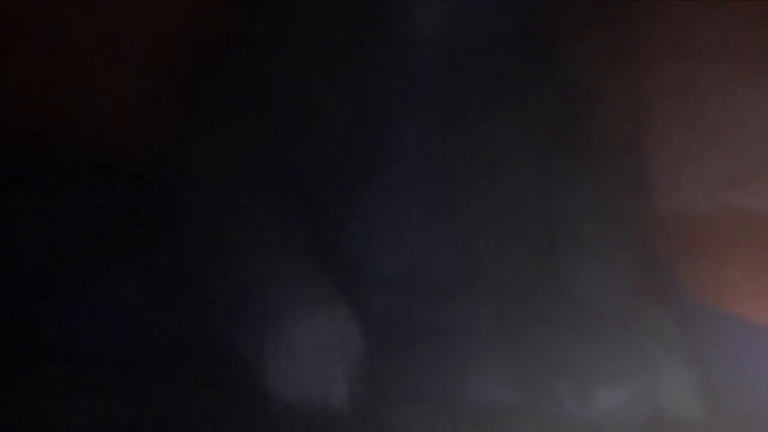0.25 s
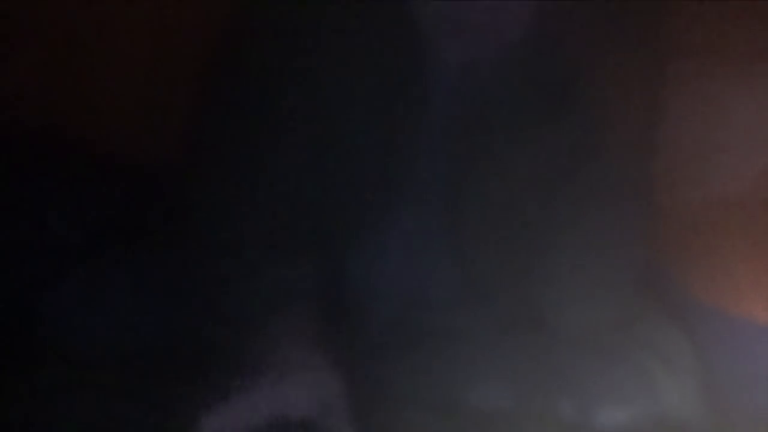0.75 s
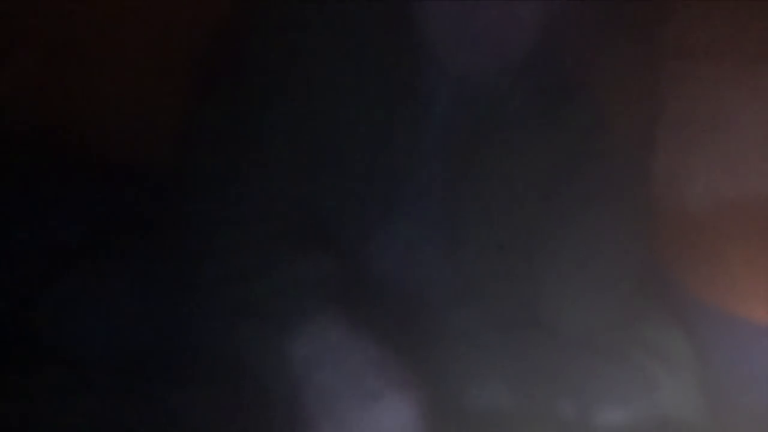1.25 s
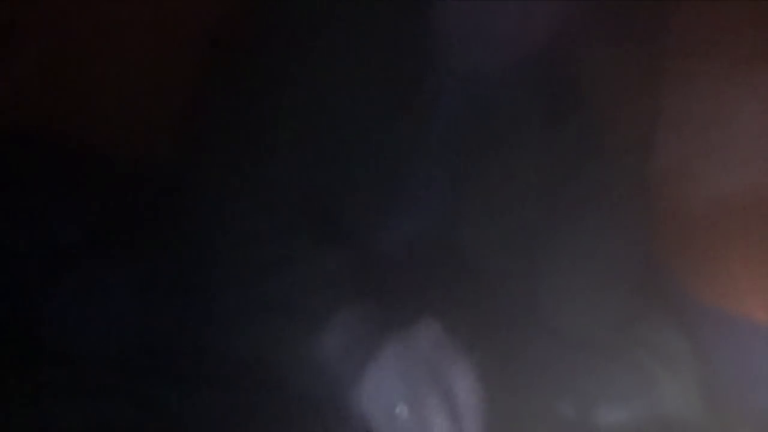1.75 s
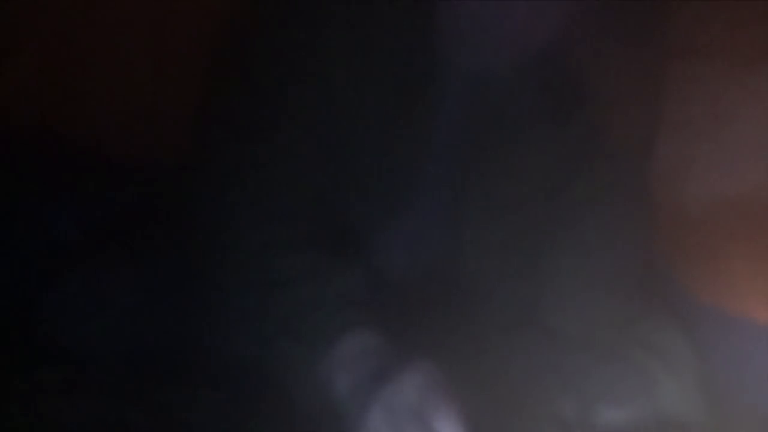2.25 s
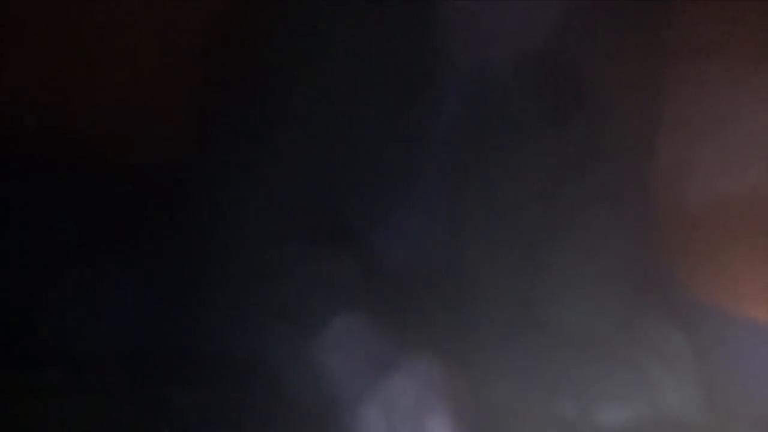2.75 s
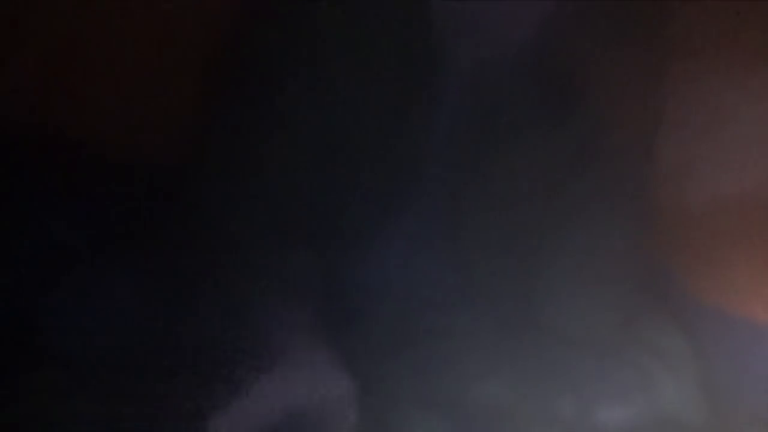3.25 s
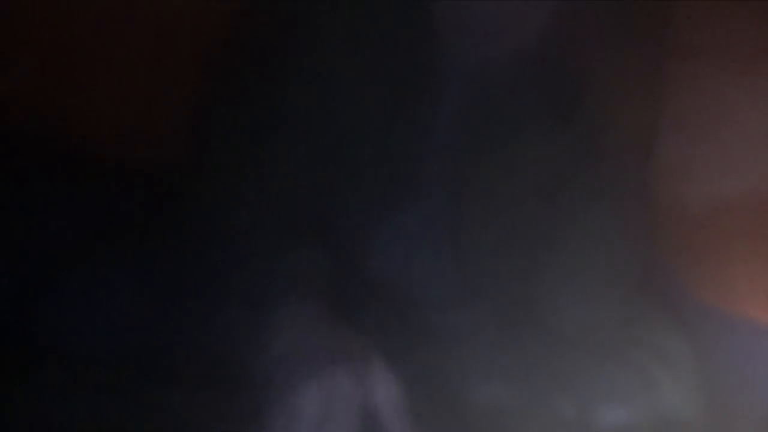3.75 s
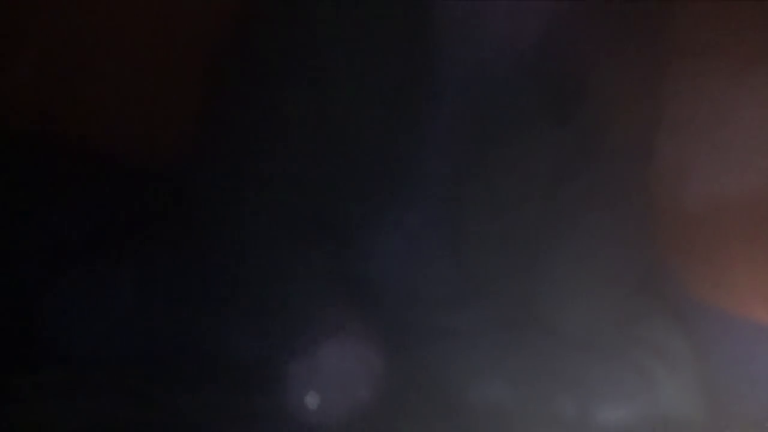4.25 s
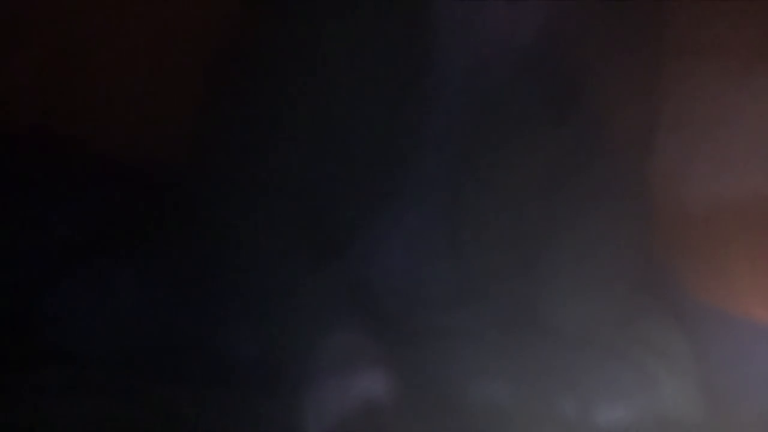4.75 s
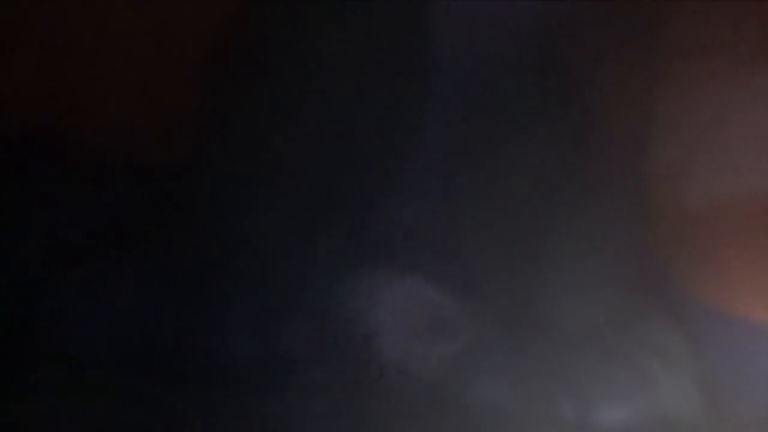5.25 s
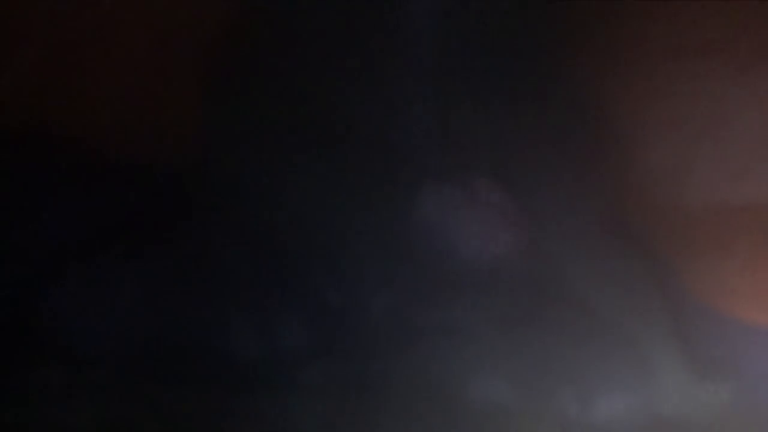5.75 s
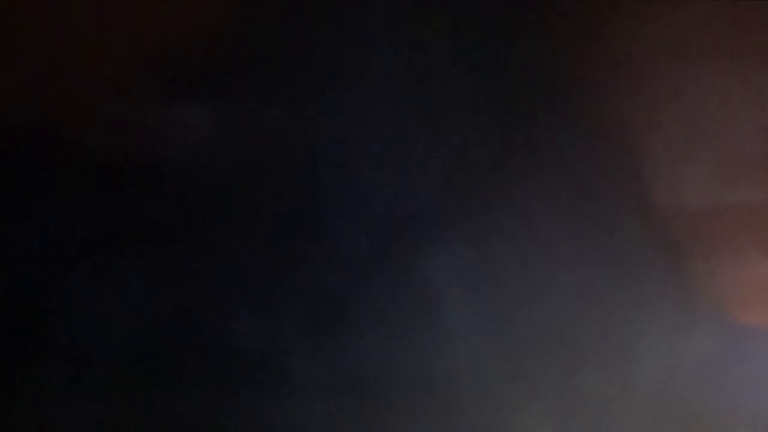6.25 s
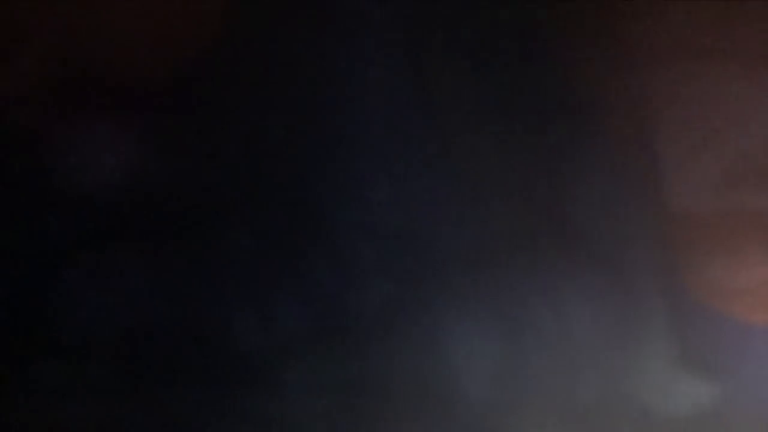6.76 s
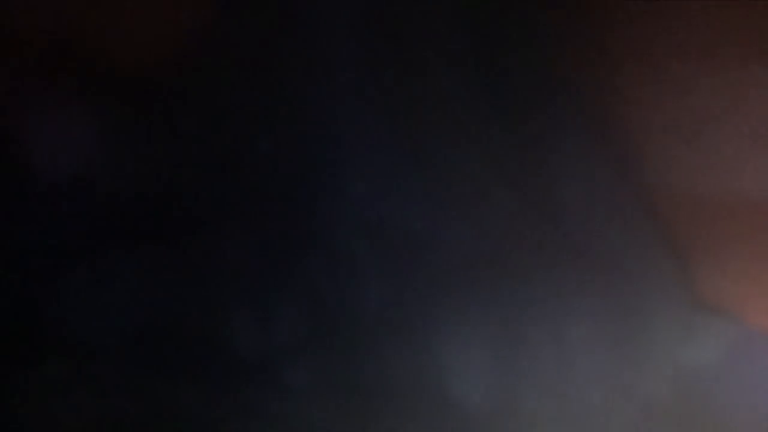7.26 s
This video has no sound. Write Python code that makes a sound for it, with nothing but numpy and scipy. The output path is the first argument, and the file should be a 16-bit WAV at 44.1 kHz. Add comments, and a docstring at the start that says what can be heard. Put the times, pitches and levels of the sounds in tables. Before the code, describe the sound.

Gritty finger strokes and sharp little ticks on a small box, one harsh scratching hiss early on, then rustling cloth over a soft outdoor hush.

```python
"""A small match case is handled close by in a quiet tent, over a soft outdoor hush that lasts throughout.
First sleeves swish; then fingers rub the case in gritty strokes of stick-slip friction, one a loud scratch.
Sharp ticks of matches on the case, damped resonances, join in; a thin, very faint whine pulses in the lull.
Further strokes and taps follow; lastly sleeves swish more strongly and ribbed fabric squeaks in narrow bands.
A faint hollow note, a wavering gliding tone, swells three times along the way."""
import sys
import numpy as np
from scipy import signal
from scipy.fft import rfft, irfft, next_fast_len
from scipy.io import wavfile

SR = 44100
rng = np.random.default_rng(int(sys.argv[2]) if len(sys.argv) > 2 else 0)


def master_out(mix):
    """Clip the mix to full scale and print it as 16-bit PCM to the path in sys.argv[1]."""
    frames = np.transpose(np.atleast_2d(mix))
    ceiling = np.clip(frames, -1, 1)
    pcm = np.round(ceiling * 32767).astype(np.int16)
    wavfile.write(sys.argv[1], SR, pcm)


N = 330309
TIME = np.arange(N) / SR   # s


# Each new grip changes how the rubbed edge and the wall ring:
# (start t/s, edge f/Hz, edge width/Hz, edge boost level/dB, wall f/Hz)
GRIPS = [(.7, 8170, 1600, 8.5, 2700), (1.07, 8700, 2200, 8, 6500), (1.319, 8350, 1110, 10, 3850),
         (1.44, 8600, 1500, 7, 4840), (1.665, 8500, 1900, 8, 3750), (1.815, 8450, 1100, 10.5, 6300),
         (1.965, 8650, 1710, 10, 3000), (3.29, 8350, 1700, 8, 2530), (3.54, 8600, 1400, 8, 5500),
         (4.371, 8300, 1300, 14, 4100), (4.54, 7900, 2500, 3.5, 4600), (4.78, 8400, 1000, 9, 4150),
         (4.969, 8800, 1800, 6, 4800), (5.115, 9000, 3980, 3, 6200)]


def rubbing(release_s=5.3):
    """Succession of boundary conditions: one grip hands over to the next until the case is let go."""
    ends = [row[0] for row in GRIPS[1:]] + [release_s]
    total = np.zeros(N)
    for (start, *ring), end in zip(GRIPS, ends):
        total += grip(start, end, *ring)
    return total


# Broad colour of the friction: (f/Hz, level/dB per Hz)
FRICTION_COLOUR = [(40, -56), (230, -32), (600, -17), (850, -25.5), (1080, -16.5), (1900, -14), (2180, -18),
                   (2500, -8.5), (5000, -3.5), (7000, -1), (10000, 2.5), (11800, -4.5), (14500, -4),
                   (16000, -17)]
# Fixed resonances of the case: (f/Hz, width/Hz, boost level/dB)
CASE_RESONANCES = [(1470, 260, 4), (2850, 300, 3), (3900, 300, 2)]
WALL_FROM_HZ, EDGE_FROM_HZ = 2200, 6500


def grip(start_s, end_s, edge_hz, edge_width_hz, edge_db, wall_hz, wall_width_hz=700, wall_db=3, splinter_db=-6):
    """Forced vibration: frictional slips ring the resonances of the case for as long as one grip lasts."""
    at, gate = gesture(start_s, end_s)
    friction = rms_one(slips(len(at), per_s=22000, spread_db=2.5, flutter_db=1.5, flutter_per_s=600))
    rough = friction + from_db(splinter_db) * splinters(len(at))
    force = colour(rough, FRICTION_COLOUR)
    grip_resonances = [(edge_hz, edge_width_hz, edge_db), (wall_hz, wall_width_hz, wall_db)]
    rung = boost(force, CASE_RESONANCES + grip_resonances)
    # the place of contact decides how much the edge, the wall and the hollow body each sound
    below, edge = split(rung, EDGE_FROM_HZ)
    body, wall = split(below, WALL_FROM_HZ)
    out = np.zeros(N)
    for gain, part in zip(stroke_gains(TIME[at]), (edge, wall, body)):
        out[at] += gate * gain * rms_one(part)
    return out


def slips(size, per_s, spread_db, flutter_db, flutter_per_s):
    """Stick-slip friction: tiny catches of uneven strength, swayed by the unsteady pressure of the hand."""
    caught = rng.random(size) < per_s / SR
    unevenness = from_db(spread_db * np.clip(rng.standard_normal(size), -2, 2))
    strength = rng.standard_normal(size) * unevenness
    return caught * strength * from_db(flutter_db * drift(size, flutter_per_s))


def splinters(size, per_s=70, width_hz=280, count=14):
    """Impulse response: now and then a rough spot catches and rings briefly at a pitch of its own."""
    catches = (rng.random((count, size)) < per_s / SR) * rng.uniform(0.93, 1, (count, size))
    pitches_hz = np.geomspace(2700, 11000, count)
    # the tiny offset keeps the filter clear of vanishing numbers
    return rms_one(sum(resonate(c + 1e-18, hz, width_hz) for c, hz in zip(catches, pitches_hz)))


STROKE_ATTACK_S = 0.0079   # first bite of a stroke
LIFT_DB_PER_S = 438   # extra dying away once the finger lifts
STROKE_FADE_DB, STROKE_FADE_CURVE = 6.5, 1.14   # drop over the fall time; roundness of that drop


def stroke_pressure(t, rise_s, fall_s, swell_db):
    """Amplitude envelope: a stroke bites, swells or eases towards its peak time, fades, and dies on lifting."""
    bite = np.clip(.5 + t / (2 * STROKE_ATTACK_S), 0, 1)
    pressing = swell_db * np.clip(1 - t / rise_s, 0, 1)   # a negative swell starts loud
    easing = STROKE_FADE_DB * np.clip((t - rise_s) / fall_s, 0, 1) ** STROKE_FADE_CURVE
    lifted = LIFT_DB_PER_S * np.maximum(t - rise_s - fall_s, 0)
    return bite * from_db(-pressing - easing - lifted)


# Strokes on the case: (start t/s, rise t/s, fall t/s, swell over the rise level/dB,
# then at the peak: edge hiss level/dB, wall rasp level/dB, hollow body level/dB)
STROKES = [(.707, 0.028, 0.018, 4.5, -43, -42.5, -45), (.752, .088, .025, 1, -49, -52, -56),
           (1.08, .05, .045, 3, -41, -55, -53.5), (1.175, 0.047, 0.054, 1, -48.5, -57, -61.5),
           (1.318, 0.029, 0.037, 7, -46, -46.5, -51.5), (1.369, 0.039, 0.01, 7, -38, -40, -55),
           (1.444, 0.076, 0.032, 5.5, -39, -39, -49.5), (1.556, 0.091, .015, 16, -34.5, -46, -45),
           (1.664, 0.12, .042, 3.5, -26.5, -30.5, -40), (1.817, 0.026, 0.059, 1.5, -20, -32, -45.5),
           (1.86, .025, .045, 7, -26, -28, -40), (1.975, 0.034, 0.026, -1, -41, -42, -48),
           (2.04, 0.17, 0.13, -4.5, -56.5, -62.5, -65.5), (2.245, 0.04, 0.049, 4, -48, -52.5, -68),
           (2.385, 0.065, 0.028, 2.5, -49.5, -52.5, -57), (2.515, 0.018, 0.052, -1, -52.5, -59, -65),
           (2.61, 0.093, .07, 3, -53, -64.5, -75), (3.306, .008, 0.05, 5, -42.5, -47, -54),
           (3.345, .057, .05, 9.5, -37.5, -41.5, -47.5), (3.45, 0.049, .025, 3.5, -41.5, -45.5, -54),
           (3.546, 0.087, .035, 11.5, -29.5, -39.5, -46), (3.675, 0.01, 0.067, 6, -41.5, -47.5, -55),
           (4.389, .009, .01, 8, -55, -50.5, -57), (4.453, .008, .012, -1, -54, -53.5, -61),
           (4.481, .025, .012, 9, -46.5, -50.5, -50.5), (4.549, 0.021, .025, -0.5, -45.5, -47.5, -53.5),
           (4.595, .015, 0.062, -3, -50.5, -47, -56), (4.657, .025, .02, 2, -45, -44, -49),
           (4.696, 0.021, .017, 2, -40.5, -40.5, -42), (4.79, 0.081, .035, 14, -42.5, -42.5, -52.5),
           (4.917, .024, .02, -2, -40.5, -44, -55.5), (4.965, 0.046, 0.062, 7, -44, -48, -66),
           (5.112, 0.047, 0.013, 5, -39.5, -49.5, -57), (5.18, 0.035, 0.019, 4, -54, -54.5, -66)]


def stroke_gains(t):
    """Incoherent addition: gains of edge, wall and body at times t, overlapping strokes adding in power."""
    power = np.zeros((3, len(t)))
    for start_s, rise_s, fall_s, swell_db, *part_db in STROKES:
        if t[0] - .5 < start_s < t[-1] + STROKE_ATTACK_S:
            pressure = stroke_pressure(t - start_s, rise_s, fall_s, swell_db)
            power += np.outer(from_db(part_db), pressure) ** 2
    return np.sqrt(power)


# Ticks and taps: (t/s, peak level/dB, note f/Hz, t60 of the contact force t/s, crack level/dB re note)
TICKS = [(.712, -33.5, 1550, 0.018, -5), (0.738, -39, 2700, 0.0097, 1), (1.082, -37, 9000, .015, -4),
         (1.457, -21.5, 7000, .01, 0), (1.675, -17, 9700, .035, -6), (1.962, -19, 8900, .008, 1),
         (2.0043, -13.5, 8950, .003, -8), (2.007, -16.5, 8100, 0.018, -17), (2.417, -32.5, 4000, .006, 0),
         (3.319, -35, 8900, .008, -9), (3.552, -32, 9000, .012, -5), (3.668, -39.5, 586, 0.018, -9),
         (3.678, -32.5, 1330, .008, -2.5), (4.422, -36, 7900, 0.011, -14), (4.454, -39, 3280, 0.016, -8),
         (4.552, -40, 5500, .012, -2), (4.622, -31, 4200, .012, -9), (4.646, -32, 4580, .009, -10),
         (4.7446, -20, 3440, 0.015, -6), (4.862, -19, 8100, 0.015, -25), (5.219, -22.5, 8750, 0.023, -18),
         (5.404, -34.5, 4800, .01, -6), (5.815, -30, 3180, 0.009, -1), (5.965, -31, 1430, 0.0095, -3),
         (6.949, -26, 1450, 0.0063, -1), (6.95, -33.5, 407, 0.02, -13), (6.964, -31, 740, 0.016, 3),
         (6.996, -26.5, 2600, .008, -1), (7.175, -27, 1580, 0.009, -1), (7.213, -37, 596, 0.015, -8),
         (7.251, -23, 1750, 0.014, 1.5), (7.325, -42, 1400, .01, -14), (7.351, -33, 1400, 0.012, -14),
         (7.377, -36, 1370, 0.011, -12)]


def ticks():
    """Impact excitation: a sharp contact and brief chatter ring one damped note, with a bright crack on top."""
    out, t = np.zeros(N), TIME[:SR // 16]
    for s, db, hz, t60, crack_db in TICKS:
        force = .2 * rng.standard_normal(len(t)) * from_db(-60 * t / t60)   # chatter
        force[0] = 1   # contact
        note = resonate(resonate(force, hz, hz * .3), hz, hz * .6)
        crack = band(force, 1340, 7800, order=2)
        tick = rms_one(note) + from_db(crack_db) * rms_one(crack)
        tick = from_db(db) * tick / np.abs(tick).max()
        at = round(s * SR)
        out[at:at + len(t)] += tick[:N - at]
    return out


# Colour of the cloth: (f/Hz, level/dB per Hz)
FABRIC_COLOUR = [(35, -55), (60, -26), (448, -8), (503, -2.5), (841, -12.5), (1250, -6), (1440, -2.5),
                 (2300, -8.5), (2710, -2), (3420, -6), (3930, -3), (5720, -4), (8500, -1.5), (14200, -14.5),
                 (16000, -14)]
# Resonances of the crumpling folds: (f/Hz, width/Hz, boost level/dB)
FOLD_RESONANCES = [(324, 180, 0), (1610, 410, 2)]


def sleeves(split_hz=2600, swish_db=1.5, body_db=2.0):
    """Friction at two scales: fibres brush past each other in a fine swish, while folds crumple more coarsely."""
    fine = slips(N, per_s=18000, spread_db=0.0, flutter_db=0.87, flutter_per_s=180)
    coarse = slips(N, per_s=3000, spread_db=1.5, flutter_db=0.2, flutter_per_s=87)
    fibres = colour(fine, FABRIC_COLOUR)
    folds = boost(colour(coarse, FABRIC_COLOUR), FOLD_RESONANCES)
    swish = rms_one(band(fibres, split_hz, 14500))
    body = rms_one(band(folds, 76, split_hz))
    swish_gain, body_gain = sleeve_gains()
    return swish_gain * from_db(swish_db) * swish + body_gain * from_db(body_db) * body


SLEEVE_FADE_DB = 6.5   # drop at one rise or fall time from the fastest moment
SLEEVE_FADE_CURVE = 1.68   # roundness of the swell
# Sleeve movements, levels relative to the trims in sleeves():
# (fastest moment t/s, rise t/s, fall t/s, swish level/dB, fabric body level/dB)
SLEEVE_MOVES = [(.02, .05, 0.05, -58, -58), (.21, .11, .05, -51.5, -58), (.32, 0.088, 0.12, -47, -57),
                (.68, 0.19, 0.051, -54.5, -63), (.99, .03, 0.066, -60.5, -72),
                (3.02, 0.15, 0.13, -59, -68.5), (4.19, 0.2, 0.097, -52.5, -56), (5.46, 0.24, 0.1, -55, -62),
                (5.532, 0.017, .015, -50.5, -59), (5.69, 0.095, 0.13, -47, -58),
                (5.895, 0.056, .035, -48, -53.5), (6.08, 0.15, 0.16, -44.5, -50.5),
                (6.28, 0.14, 0.057, -42.5, -45), (6.41, 0.16, 0.18, -47, -53.5),
                (6.73, 0.093, 0.062, -45, -52.5), (6.91, 0.084, .055, -38.5, -41.5),
                (7.01, 0.048, 0.035, -40, -49.5), (7.114, 0.072, 0.068, -40, -44.5),
                (7.46, 0.42, .3, -47, -53.5)]


def sleeve_gains():
    """Speed-dependent friction: each arm movement swells and fades, overlapping ones adding in power."""
    power = np.zeros((2, N))
    for s, rise_s, fall_s, *part_db in SLEEVE_MOVES:
        at = np.flatnonzero(np.abs(TIME - s) < 1)
        away = np.maximum((s - TIME[at]) / rise_s, (TIME[at] - s) / fall_s)
        swell = from_db(-SLEEVE_FADE_DB * away ** SLEEVE_FADE_CURVE)
        power[:, at] += np.outer(from_db(part_db), swell) ** 2
    return np.sqrt(power)


# Squeaky slips, levels relative to the trim in squeaks():
# (middle t/s, half length t/s, f/Hz, width/Hz, level/dB)
SQUEAKS = [(5.576, 0.017, 4340, 700, -43), (5.675, 0.049, 4300, 550, -45.5),
           (6.051, 0.025, 4700, 600, -41.5), (6.727, 0.016, 7060, 900, -42),
           (6.742, 0.013, 8130, 1000, -37.5)]


def squeaks(level_db=-1):
    """Narrow-band resonance: ribbed fabric slides fast enough to sing."""
    out = np.zeros(N)
    for s, half_s, hz, width_hz, db in SQUEAKS:
        at = np.flatnonzero(np.abs(TIME - s) < 2 * half_s)
        ribs = slips(len(at), per_s=2800, spread_db=1.0, flutter_db=0.0, flutter_per_s=270)
        squeak = rms_one(resonate(resonate(ribs, hz, width_hz), hz, 2 * width_hz))
        swell = np.exp(-((TIME[at] - s) / half_s) ** 2)
        out[at] += from_db(db + level_db) * squeak * swell
    return out


def hands():
    """Superposition: everything that sounds close by, with its echoes in the tent."""
    return tent(rubbing() + sleeves() + ticks() + squeaks())


def tent(x, wet_db=-13, t60=0.036, first_s=0.0013):
    """Early reflection: nearby surfaces return a very short, decaying scatter of echoes."""
    t = TIME[:SR // 12]
    echoes = rng.standard_normal(len(t)) * from_db(-60 * t / t60) * (t > first_s)
    echoes /= np.linalg.norm(echoes)
    return x + from_db(wet_db) * signal.fftconvolve(x, echoes)[:N]


# The hollow note, one list a swell: (t/s, f/Hz, level/dB)
HOLLOW_SWELLS = [
    [(1.68, 392.4, -67), (1.75, 401.3, -52.5), (1.82, 475, -54.5), (1.89, 503, -56), (1.95, 580, -63),
     (2.15, 535, -68)],
    [(3.7, 444, -71), (3.85, 465, -63), (3.95, 495, -59.5), (4.1, 514, -65), (4.3, 555, -64)],
    [(6.2, 500, -73), (6.3, 510, -54), (6.42, 510, -67), (6.5, 515.4, -49), (6.57, 538, -63),
     (6.85, 568, -60)],
]


def hollow_note(waver=0.43, waver_per_s=65):
    """Random modulation: a faint airy tone wavers in strength and phase and glides, mostly upward."""
    out = np.zeros(N)
    for rows in HOLLOW_SWELLS:
        at, gate = gesture(rows[0][0], rows[-1][0], edge_s=.03)
        hz, db = follow(rows, TIME[at])
        unsteady = 1 + waver * (drift(len(at), waver_per_s) + 1j * drift(len(at), waver_per_s))
        rotation = np.exp(2j * np.pi * np.cumsum(hz) / SR)
        out[at] += gate * from_db(db) * rms_one(np.real(unsteady * rotation))
    return out


def whine(hz=3400, width_hz=120, pulses_per_s=24, level_db=-72, middle_s=3.0, half_s=0.69):
    """Amplitude modulation: a thin, very faint band of noise pulses in the quiet."""
    noise = rng.standard_normal(N)
    tone = rms_one(resonate(resonate(noise, hz, width_hz), hz, width_hz))
    pulses = np.sin(np.pi * pulses_per_s * TIME) ** 2
    swell = np.exp(-((TIME - middle_s) / half_s) ** 2)
    return from_db(level_db) * rms_one(tone * pulses) * swell


# Colour of the outdoor hush: (f/Hz, level/dB per Hz)
HUSH_COLOUR = [(15, -60), (25, -30), (49, -19), (141, -16), (185, -10.5), (256, -9), (335, -4.5), (451, -5),
               (591, -2), (1260, -5), (1440, -6.5), (2410, -10), (3420, -10), (10700, -14), (16000, -19.5)]
# Faint rings in the hush: (f/Hz, width/Hz, boost level/dB)
HUSH_RINGS = [(239.7, 4.5, 8.5), (523, 49, 5.5), (897, 59, 4.5)]
# Course of the hush: (t/s, level/dB)
HUSH_LEVEL = [(0, -53.5), (1, -54.5), (2.3, -54), (3.05, -57), (3.25, -57), (3.8, -55), (4.4, -55),
              (5.3, -54.5), (7.49, -50.5)]


def hush():
    """Filtered noise: an even outdoor hush, slightly hollow inside the tent."""
    air = boost(colour(rng.standard_normal(N), HUSH_COLOUR), HUSH_RINGS)
    level_db, = follow(HUSH_LEVEL, TIME)
    return from_db(level_db) * rms_one(air)


def from_db(db):
    """Logarithmic level: decibels to amplitude gain."""
    return 10 ** (np.asarray(db) / 20)


def rms_one(x):
    """Normalisation: scale to unit mean power."""
    return x / np.sqrt(np.mean(x ** 2) + 1e-20)


def follow(rows, t):
    """Linear interpolation: the columns of a curve at times t."""
    s, *columns = np.transpose(rows)
    return [np.interp(t, s, c) for c in columns]


def gesture(start, end, edge_s=.004):
    """Equal-power gating: the samples between two times, and a soft gate over them."""
    at = np.flatnonzero((TIME > start - edge_s) & (TIME < end + edge_s))
    inside = np.minimum(TIME[at] - start, end - TIME[at])
    return at, np.sqrt(np.clip(.5 + .5 * inside / edge_s, 0, 1))


def drift(size, per_s):
    """Slow random fluctuation: normal draws joined by straight lines."""
    steps = np.arange(size) * per_s / SR
    knots = int(steps[-1]) + 2
    return np.interp(steps, np.arange(knots), rng.standard_normal(knots))


def colour(x, points):
    """Spectral shaping: weight a sound by a (f/Hz, level/dB) table over log frequency."""
    size = next_fast_len(len(x))
    hz, db = np.transpose(points)
    bins = np.maximum(np.arange(size // 2 + 1) * SR / size, 1)
    gains = from_db(np.interp(np.log(bins), np.log(hz), db))
    return irfft(rfft(x, size) * gains, size)[:len(x)]


def band(x, low_hz, high_hz, order=3):
    """Band limitation: a Butterworth band-pass."""
    edges = [low_hz, min(high_hz, .45 * SR)]
    return signal.sosfilt(signal.butter(order, edges, "band", fs=SR, output="sos"), x)


def resonate(x, hz, width_hz):
    """Damped resonance: a pole pair with gain 1 on top."""
    r = np.exp(-np.pi * width_hz / SR)
    feed = np.array([1, 0, -1]) * (1 - r * r) / 2
    return signal.lfilter(feed, [1, -2 * r * np.cos(2 * np.pi * hz / SR), r * r], x)


def boost(x, resonances):
    """Resonances in series: pass a sound through (f/Hz, width/Hz, level/dB) rows in turn."""
    for hz, width_hz, db in resonances:
        x = x + (from_db(db) - 1) * resonate(x, hz, width_hz)
    return x


def split(x, hz):
    """Complementary filtering: the parts below and above a frequency add up to the whole."""
    low = signal.sosfiltfilt(signal.butter(4, hz, fs=SR, output="sos"), x)
    return low, x - low


def stereo(mid, other, width):
    """Decorrelation: a separately drawn twin of the sound, as the side signal, gives it width."""
    side = colour(other, width)
    return np.array([mid + side, mid - side])


# Width of near and far sounds: (f/Hz, side re mid level/dB)
NEAR_WIDTH = [(100, -22), (300, -31), (800, -14), (1500, -34), (2800, -19), (5500, -41.5), (9000, -47),
              (14000, -52)]
FAR_WIDTH = [(30, -2), (150, -15), (350, -12), (700, -7.5), (1500, -3), (3000, -3), (6000, -29),
             (14000, -50)]


def scene():
    """Superposition in space: the hands are straight ahead, the hush is broad, note and whine are central."""
    near = stereo(hands(), hands(), NEAR_WIDTH)
    far = stereo(hush(), hush(), FAR_WIDTH)
    return near + far + hollow_note() + whine()


def record(dry, cutoff_hz=15900):
    """Low-pass filtering: an elliptic filter cuts the top steeply."""
    return signal.sosfilt(signal.ellip(12, .1, 90, cutoff_hz, fs=SR, output="sos"), dry)


dry = scene()
out = record(dry)
master_out(out)
```